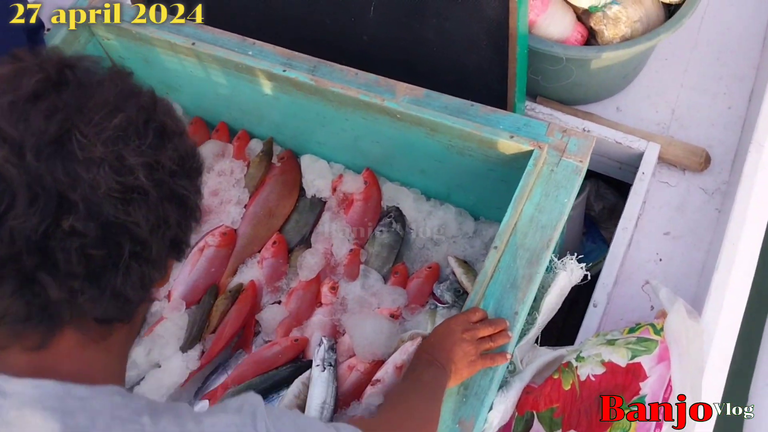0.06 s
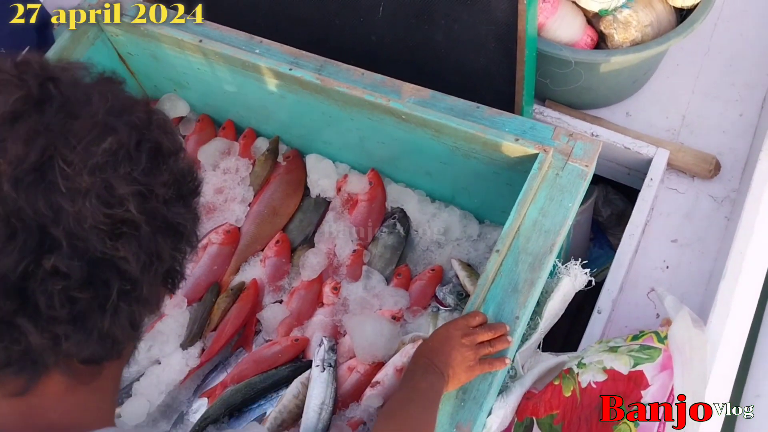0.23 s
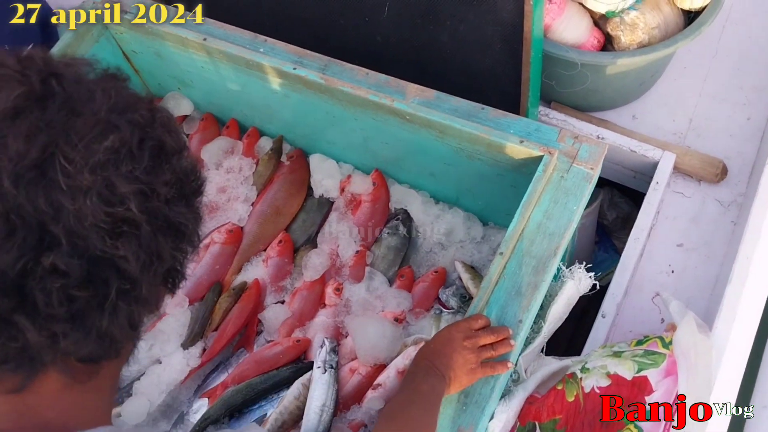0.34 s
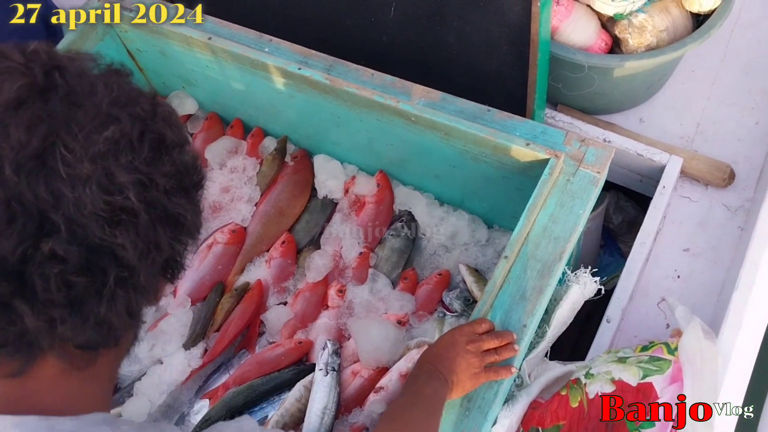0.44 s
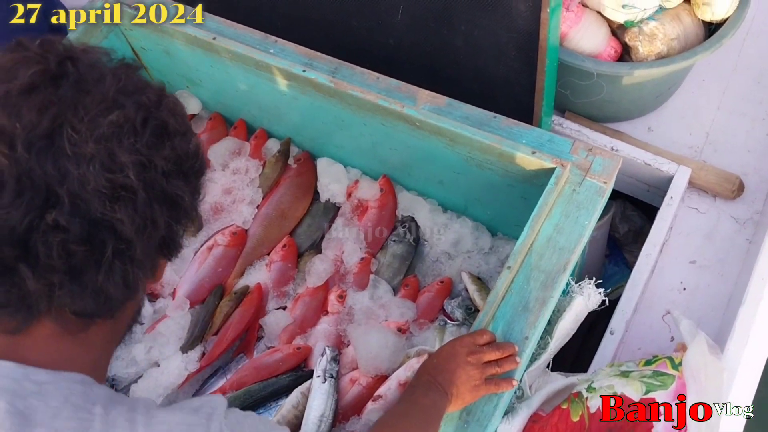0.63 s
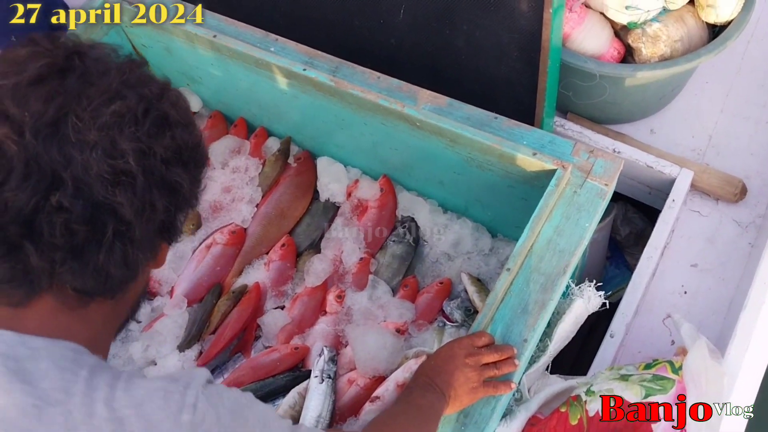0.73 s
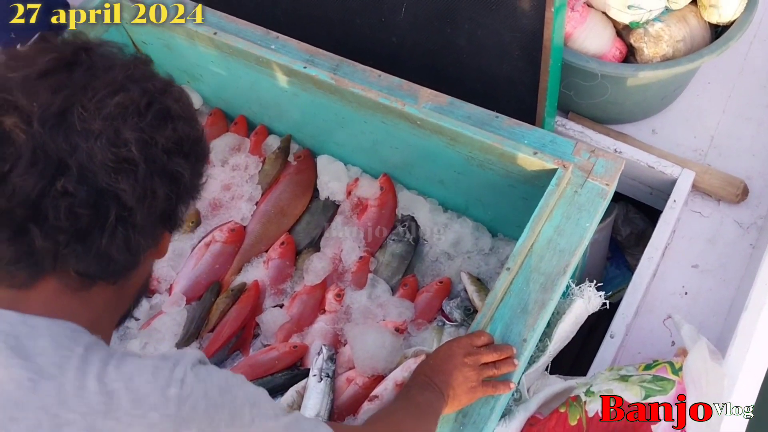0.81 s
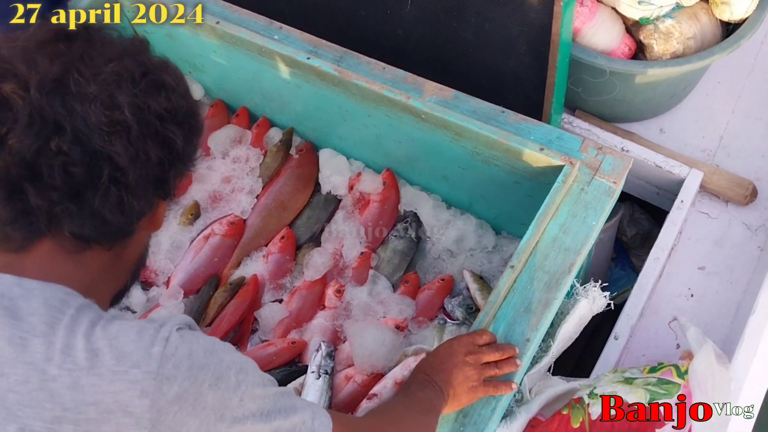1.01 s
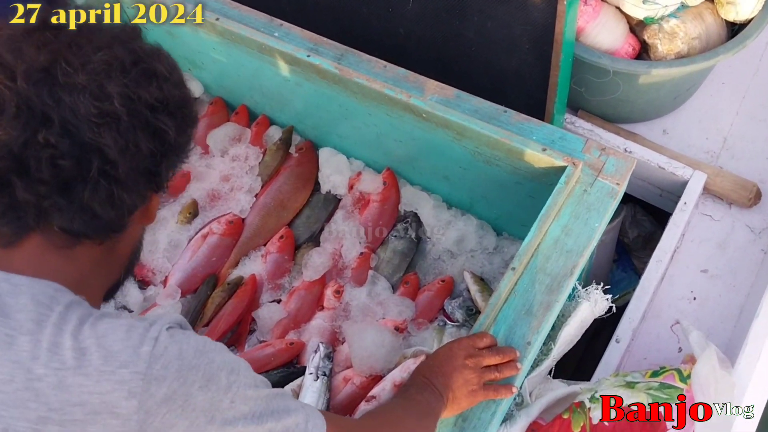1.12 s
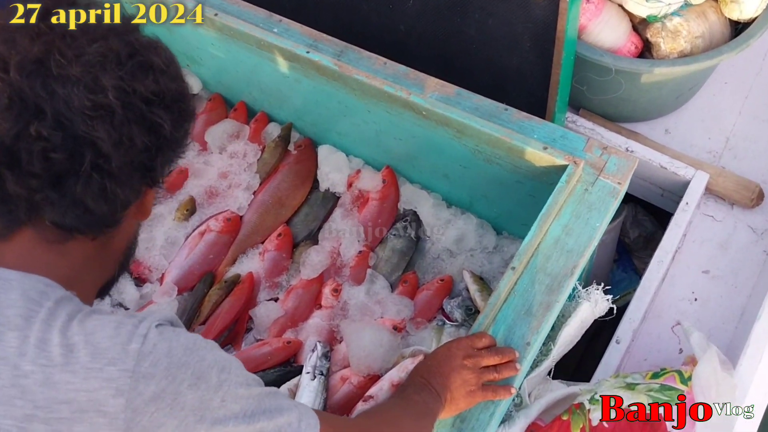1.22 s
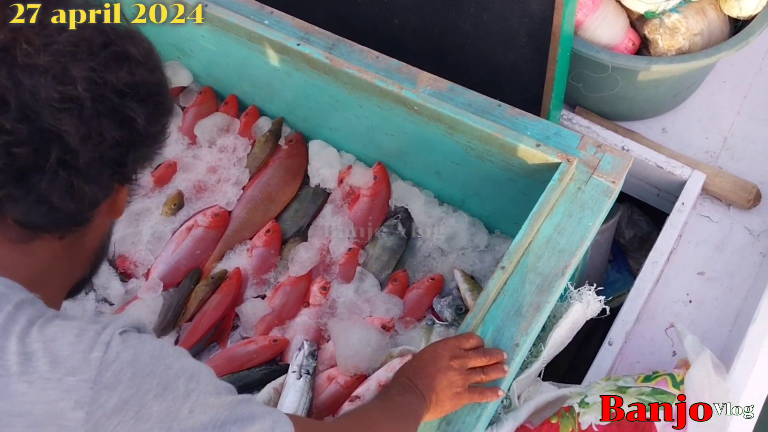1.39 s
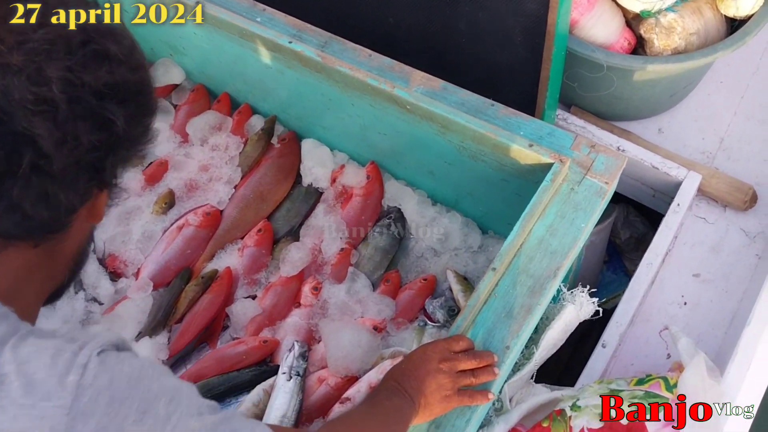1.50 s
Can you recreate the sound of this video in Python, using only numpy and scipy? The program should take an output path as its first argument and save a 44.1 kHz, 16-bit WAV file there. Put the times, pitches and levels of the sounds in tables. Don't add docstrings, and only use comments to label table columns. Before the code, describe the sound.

Fish and crushed ice shifted by hand in a wooden box, with one knocking thump, windy boat

```python
import sys
import numpy as np
from scipy import signal
from scipy.fft import rfft, irfft
from scipy.io import wavfile
from scipy.ndimage import uniform_filter1d

SR = 44100
rng = np.random.default_rng(int(sys.argv[2]) if len(sys.argv) > 2 else 0)


def store_pcm(level_fs):
    pcm = np.round(np.clip(level_fs, -1, 1) * 32767).astype(np.int16)
    wavfile.write(sys.argv[1], SR, np.atleast_2d(pcm).T)


def gain_from_db(level_db):
    decades = np.asarray(level_db, float) / 20
    return 10 ** decades


N = 68355
T = np.arange(N) / SR


def rms_one(x):
    return x / np.sqrt(np.mean(x ** 2) + 1e-20)


def drift(rate_hz):
    r = np.exp(-80 * np.pi * rate_hz / SR)
    noise = rng.standard_normal(N // 40 + 2002)
    slow = signal.lfilter([1], [1, -2 * r, r * r], noise)[2000:]
    return np.interp(np.arange(N) / 40, np.arange(len(slow)), rms_one(slow))


def colour(x, spectrum):
    hz, db = np.transpose(spectrum)
    f = np.maximum(np.arange(N // 2 + 1) * SR / N, 1)
    knots_hz = [hz[0] / 2, *hz, hz[-1] * 2]
    knots_db = [db[0] - 30, *db, db[-1] - 30]
    gain_db = np.interp(np.log(f), np.log(knots_hz), knots_db)
    return irfft(rfft(x) * gain_from_db(gain_db), N)


def ring(x, hz, t60_s):
    r, w = gain_from_db(-60 / (t60_s * SR)), 2 * np.pi * hz / SR
    return signal.lfilter([0, np.sin(w)], [1, -2 * r * np.cos(w), r * r], x + 1e-18)


def body(x, peaks):
    out = 0
    for k, (hz, width_hz, db) in enumerate(peaks):
        r = np.exp(-np.pi * width_hz / SR)
        poles = [1, -2 * r * np.cos(2 * np.pi * hz / SR), r * r]
        out = out + (-1) ** k * gain_from_db(db) * signal.lfilter([1 - r * r, 0, r * r - 1], poles, x)
    return out


def pair(alike):
    mid, side = rng.standard_normal((2, N))
    alike = np.clip(alike, 0, 1)
    return np.sqrt((1 + alike) / 2) * mid + np.sqrt((1 - alike) / 2) * side * [[1], [-1]]


def grains(rate_per_s):
    hits = rng.random(N) < rate_per_s / SR
    size = gain_from_db(5.2 * np.minimum(rng.exponential(1, N), 4))
    return rms_one(hits * size * rng.choice([-1, 1], N))


def sides(pan_db):
    return gain_from_db(np.array([pan_db / 2, -pan_db / 2]).reshape(2, -1))


def late_right(x, lag_samples):
    return np.array([x[0], np.roll(x[1], lag_samples)])


SLIDE_LAG, BOX_LAG, FIRST_LAG = 6, 15, 11
FIRST_OVER_S = .645
SHADE_HZ, SHADE_WIDTH_HZ, SHADE_DEPTH = 4500, 2200, .5


def from_box(x):
    early = T < FIRST_OVER_S
    left, right = late_right(x * early, FIRST_LAG) + late_right(x * ~early, BOX_LAG)
    shade = SHADE_DEPTH / 2 * body(right, [(SHADE_HZ, SHADE_WIDTH_HZ, 0)])
    return np.array([left, right - shade])


WASH_DB, WASH_PAN_DB, WASH_PATCHY_DB = -48, -2.5, 1.75
# frequency in Hz, density in dB per Hz.
WASH_SPECTRUM = [(250, -2), (450, 4), (800, -1), (1300, -9), (2500, -18.5), (5000, -27), (7700, -31.5),
                 (8500, -38.5), (15500, -34.5)]


def wash():
    x = colour(pair(0.092), WASH_SPECTRUM) * gain_from_db(WASH_PATCHY_DB * drift(1.6))
    return late_right(rms_one(x) * gain_from_db(WASH_DB) * sides(WASH_PAN_DB), BOX_LAG)


SPRAY_S, SPRAY_RISE_S, SPRAY_HOLD_S, SPRAY_FADE_S = 0.26, 0.055, 0.091, 0.13
SPRAY_DB, SPRAY_PAN_DB = -56.5, 3
# frequency in Hz, density in dB per Hz.
SPRAY_SPECTRUM = [(2500, 1.5), (3900, -3), (5200, 3.5), (6200, -11), (7300, -2.5), (8100, -14)]


def spray():
    rise = np.clip((T - SPRAY_S) / SPRAY_RISE_S, 0, 1)
    fade = np.exp(-np.maximum(T - SPRAY_S - SPRAY_HOLD_S, 0) / SPRAY_FADE_S)
    return rms_one(colour(pair(0.09), SPRAY_SPECTRUM)) * rise * fade * gain_from_db(SPRAY_DB) * sides(SPRAY_PAN_DB)


WIND_DB, WIND_ALIKE, EVEN_S = 3.64, .15, 0.033
WIND_LUMP_DB, LUMPS_PER_S = 1.5, 46
# time in seconds, level in dB, left-right in dB.
GUSTS = [(0, -42, 5), (.14, -42, 5.5), (.22, -33, 14.5), (.33, -33, 12), (0.411, -36, 3), (0.5, -36, 0),
         (.57, -43, 0), (.65, -33, 1.5), (.74, -34, 5), (.79, -40, -3), (.87, -34, 5), (.94, -37, 0),
         (1.0, -36, -7), (1.11, -36, -8), (1.16, -39, -4.5), (1.28, -39, -4), (1.36, -37, -6),
         (1.55, -39, -4)]
# frequency in Hz, density in dB per Hz.
WIND_SPECTRUM = [(28, -52), (50, 2), (76, 2.5), (110, -6), (190, -8), (300, -18.5), (500, -37.5),
                 (900, -41.5)]


def wind():
    s, db, pan_db = np.transpose(GUSTS)
    lumps = gain_from_db(WIND_LUMP_DB * np.array([drift(LUMPS_PER_S), drift(LUMPS_PER_S)]))
    flow = colour(pair(WIND_ALIKE) * lumps, WIND_SPECTRUM)
    size = int(EVEN_S * SR)
    power = uniform_filter1d(uniform_filter1d(flow ** 2, size), size)
    flow = flow / np.sqrt(power + 1e-20)
    return flow * gain_from_db(WIND_DB + np.interp(T, s, db)) * sides(np.interp(T, s, pan_db))


BUFFET_CYCLES, BUFFET_SOFT, BUFFET_CUT_HZ = 3.0, 1.2, 600
PORT_DETUNE = 0.34
# start in seconds, peak in dB, pitch in Hz, left-right in dB.
EDDIES = [(0.095, -32.5, 155, 19), (0.147, -39.5, 91, 9), (0.198, -27.5, 90, 1), (0.2209, -23.5, 303, 19.5),
          (0.2383, -28.5, 278, 23), (.246, -26.5, 290, 21), (.2545, -32, 106, 14), (0.291, -29, 278, 24),
          (0.278, -29.5, 274, 23), (0.3, -29.5, 104, 23), (0.569, -34, 184, -9), (0.794, -27, 150, -1),
          (1.052, -27, 270, -2.5), (1.228, -35, 270, -4), (0.331, -17, 75, 13), (.376, -27.5, 155, 25.5),
          (0.398, -20, 62, -6), (0.451, -20, 167, 1.5), (0.516, -24.5, 103, -1), (0.625, -20.5, 167, 15),
          (0.713, -26.5, 95, 29), (0.753, -34, 94, -13), (0.8285, -25.5, 177, 25.5), (0.865, -23, 72, 23),
          (0.899, -31, 111, -27.5), (0.9, -30, 255, -22), (1.09, -24, 96, -13), (0.972, -21.5, 70, -14),
          (1.111, -25.5, 136, -12.5), (1.313, -29.5, 135, -27), (1.448, -24.5, 178, 3.5)]
# start in seconds, peak in dB, pitch in Hz, left-right in dB.
BIG_EDDY = (.2281, -11.5, 122, 20)


def buffets():
    out = np.zeros((2, N))
    for s, db, hz, pan_db in EDDIES + [BIG_EDDY]:
        quieter = np.array([[pan_db < 0], [pan_db > 0]])
        detune = PORT_DETUNE * np.sign(pan_db) * rng.uniform(0, 1) * quieter
        cycles = np.maximum(T - s, 0) * hz * (1 + detune)
        rise = (1 - np.exp(-cycles * 2 * np.pi * BUFFET_SOFT)) ** 2
        shape = rise * gain_from_db(4 - 40 * cycles / BUFFET_CYCLES)
        out += gain_from_db(db) * sides(pan_db) * shape * np.sin(2 * np.pi * cycles)
    return signal.sosfilt(signal.butter(3, BUFFET_CUT_HZ, fs=SR, output="sos"), out)


SLIDE_DB, SLIDE_RELEASE_S = 6.0, 0.042
GRAINS_PER_S, GRAIN_SHARE = 1300, 0.16
FLICKER_DB, FLICKER_HZ = 2.2, 41
# start in seconds, rise in seconds, length in seconds, level in dB, treble in dB.
STROKES = [
    (0.442, 0.0055, 0.0079, -57, 6.5),
    (0.63, 0.029, 0.035, -49, -4),
    (0.823, 0.034, 0.079, -55.5, 10.5),
    (0.916, 0.027, 0.089, -62.5, 6),
    (0.997, 0.021, 0.064, -61, 7),
    (1.078, .01, 0.022, -65, 2),
    (1.14, 0.046, 0.077, -60, 11),
    (1.272, 0.057, 0.13, -55.5, 11.5),
    (1.424, 0.05, 0.042, -55.5, 5),
    (1.475, 0.036, .12, -57.5, 10.5),
]
# frequency in Hz, density in dB per Hz.
SLIDE_DULL = [(450, -42), (1100, 12.5), (2500, 7.5), (4500, 4.5), (7300, -7.5), (8600, -39)]
SLIDE_BRIGHT = [(7000, -16), (9000, -15.5), (11000, -9.5), (13500, -13), (15500, -15), (16500, -43)]


def slides():
    raw = np.sqrt(GRAIN_SHARE) * grains(GRAINS_PER_S) + np.sqrt(1 - GRAIN_SHARE) * pair(0.055)
    low, high = np.zeros((2, N))
    for s, rise_s, length_s, db, treble_db in STROKES:
        rise = np.clip((T - s) / max(rise_s, .002), 0, 1)
        release = np.exp(-np.maximum(T - s - length_s, 0) / SLIDE_RELEASE_S)
        power = (rise * release) ** 2
        low += power * gain_from_db(2 * db)
        high += power * gain_from_db(2 * (db + treble_db))
    flicker = gain_from_db(FLICKER_DB * drift(FLICKER_HZ))
    ice = colour(raw, SLIDE_DULL) * np.sqrt(low) + colour(raw, SLIDE_BRIGHT) * np.sqrt(high)
    return late_right(ice, SLIDE_LAG) * flicker * gain_from_db(SLIDE_DB)


RING_ROUGH, RING_ROUGH_HZ = .8, 250
# start in seconds, peak in dB, pitch in Hz, t60 in seconds.
STRUCK = [(.150, -40.5, 713, 0.028), (.6204, -28, 1152, .02), (.6204, -24.5, 2480, 0.012),
          (.6203, -44, 4640, 0.007), (.6204, -21, 1525, 0.013), (0.6203, -25, 2780, 0.0084),
          (.6592, -23, 1100, 0.019), (.6602, -30.5, 2820, .025), (.6598, -34, 3550, 0.032),
          (0.6594, -34, 4050, 0.024), (.661, -32, 5850, 0.0087), (0.687, -42, 2700, .03),
          (.689, -41, 1870, 0.063), (0.716, -38, 1810, .05), (0.755, -42.5, 492, 0.1),
          (1.254, -35.5, 570, 0.034), (1.321, -49, 1540, 0.053), (1.385, -15, 169.6, 0.065),
          (1.387, -28.5, 557, 0.057), (1.389, -34.5, 347, 0.096), (1.388, -38.5, 460, 0.049)]


def rings():
    flutter = 1 + RING_ROUGH * np.array([drift(RING_ROUGH_HZ) for _ in range(3)])
    out = 0
    for k, (s, db, hz, t60_s) in enumerate(STRUCK):
        t = np.maximum(T - s, 0)
        tone = np.minimum(t * hz, 1) * gain_from_db(db - 60 * t / t60_s) * np.sin(2 * np.pi * hz * t)
        out = out + tone * (flutter[k % 3] if hz > 1000 else 1)
    return from_box(np.array([out, out]))


ICE_DB, CRUNCH_PER_S, SPREAD = -12.0, 15000, .4
CRACK_T60_S, CRACK_TAIL_DB, TAIL_T60_S = .012, -16, 0.094
SNAP_S, SNAP_DB, SNAP_HZ, SNAP_T60_S = .6204, -9, 3600, .0012
NEAR_PAN_DB, HAND_CENTRED_S = 3.5, .8
# start in seconds, peak in dB, crunch length in seconds, treble tilt in dB.
LUMP_CRACKS = [
    (0.444, -46.5, 0.0047, 6),
    (0.4803, -34.5, 0.0012, 0),
    (0.559, -52, 0.0039, 8),
    (0.855, -47, 0.0042, 14),
    (0.864, -38, 0.0076, -3.5),
    (1.103, -48.5, 0.002, 3),
    (1.164, -54, 0.0024, -1),
    (1.461, -48.5, 0.0016, 4),
]
BREAK_START_S = [.6202, .6290, .6585, .6768, .6875, .6995, .7175]
# peak in dB, crunch length in seconds, treble tilt in dB.
BREAK_SHAPES = [
    (-22.5, 0.003, -9),
    (-24, 0.0016, 0.5),
    (-18, 0.0043, 4),
    (-31.5, 0.0035, -2),
    (-35, 0.0072, -10),
    (-36.5, 0.002, 2),
    (-49, 0.0025, -5),
]
# frequency in Hz, width in Hz, level in dB.
ICE_LOW = [(1110, 520, 8.5), (2020, 1760, 6.5), (2694, 540, 10.5), (4220, 1350, 2.5)]
ICE_HIGH = [(6300, 5100, 3.5), (8140, 3200, 3.5), (12900, 3600, -3.5)]


def cracks():
    crunch = rms_one(grains(CRUNCH_PER_S) + pair(0.33))
    raw = np.sqrt(1 - SPREAD) * crunch + np.sqrt(SPREAD) * pair(0)
    breaks = [(s, *row) for s, row in zip(BREAK_START_S, BREAK_SHAPES)]
    low, high = np.zeros((2, N))
    for s, db, length_s, tilt_db in LUMP_CRACKS + breaks:
        after = np.maximum(T - s - length_s, 0)
        decay = gain_from_db(-60 * after / CRACK_T60_S) + gain_from_db(CRACK_TAIL_DB - 60 * after / TAIL_T60_S)
        shape = np.clip((T - s) / (0.07 * length_s), 0, 1) * decay
        low += gain_from_db(db - tilt_db / 2) * shape
        high += gain_from_db(db + tilt_db / 2) * shape
    click = gain_from_db(SNAP_DB) * (np.arange(N) == int(SNAP_S * SR))
    snap = ring(click, SNAP_HZ, SNAP_T60_S)
    ice = gain_from_db(ICE_DB) * (body(raw * low, ICE_LOW) + body(raw * high, ICE_HIGH)) + snap
    return from_box(ice * sides(NEAR_PAN_DB * (T < HAND_CENTRED_S)))


CONTACT_HZ = 905
RATTLE_DB, RATTLE_PER_S, RATTLE_HOLD_S, RATTLE_T60_S = -50, 6500, 0.042, 0.038
BOOM_S, BOOM_HZ, BOOM_DB = .6655, 78.6, -11
BOOM_RISE_S, BOOM_HOLD_S, BOOM_T60_S = .001, .017, .06
# time in seconds, peak in dB.
LANDINGS = [
    (.6652, -18),
    (.6742, -19),
    (.691, -24),
]
# frequency in Hz, level in dB, t60 in seconds.
BOX_MODES = [(241, -9.5, 0.021), (282, -3, 0.041), (344, -13.5, 0.05), (442, -14, 0.019), (502, -11, 0.026),
             (606, -17, .025), (698, -12, 0.022), (766, -10, 0.015), (842, -14.5, 0.02), (1030, -17, 0.021),
             (1200, -2, 0.027), (1480, 6, 0.022), (1810, -2, 0.05)]


def thump():
    t = np.maximum(T - BOOM_S, 0)
    rattle_db = RATTLE_DB - 60 * np.maximum(t - RATTLE_HOLD_S, 0) / RATTLE_T60_S
    clicks = grains(RATTLE_PER_S) * (t > 0) * gain_from_db(rattle_db)
    for s, db in LANDINGS:
        clicks[int(s * SR)] = gain_from_db(db)
    knock = sum(gain_from_db(db) * ring(clicks, hz, t60_s) for hz, db, t60_s in BOX_MODES)
    knock = signal.sosfilt(signal.butter(2, CONTACT_HZ, fs=SR, output="sos"), knock)
    boom_db = BOOM_DB - 60 * np.maximum(t - BOOM_HOLD_S, 0) / BOOM_T60_S
    boom = np.minimum(t / BOOM_RISE_S, 1) * gain_from_db(boom_db) * np.cos(2 * np.pi * BOOM_HZ * t)
    out = knock + boom
    return late_right(np.array([out, out]), BOX_LAG)


def scene():
    return wash() + spray() + wind() + buffets() + slides() + rings() + cracks() + thump()


def roll_off(x):
    return signal.sosfilt(signal.butter(12, 16660, fs=SR, output="sos"), x)


RUMBLE_CUT_HZ, TOP_CUT_HZ = 63.7, 16800


def record(dry):
    x = signal.sosfilt(signal.butter(2, RUMBLE_CUT_HZ, "high", fs=SR, output="sos"), dry)
    x = signal.sosfilt(signal.cheby2(10, 50, TOP_CUT_HZ, fs=SR, output="sos"), x)
    return roll_off(x)


dry = scene()
out = record(dry)
store_pcm(out)
```